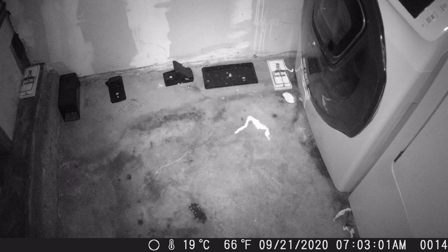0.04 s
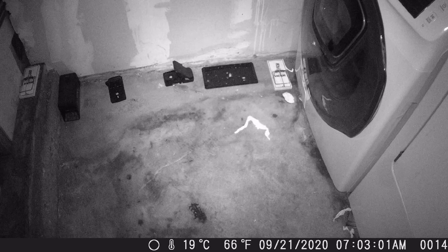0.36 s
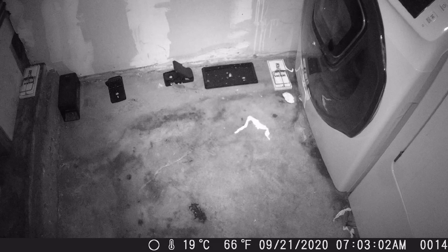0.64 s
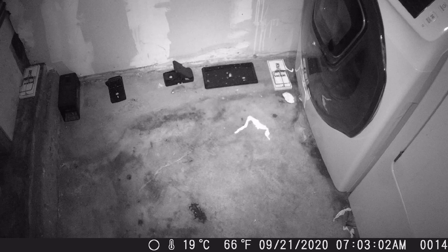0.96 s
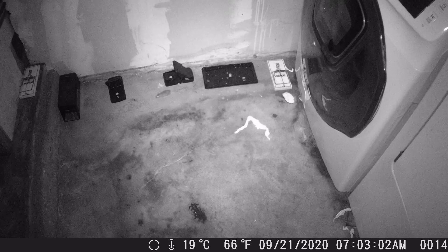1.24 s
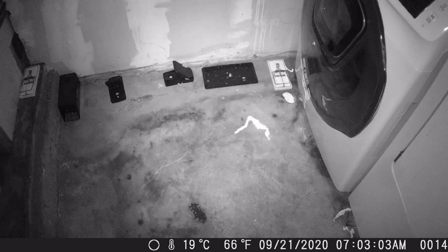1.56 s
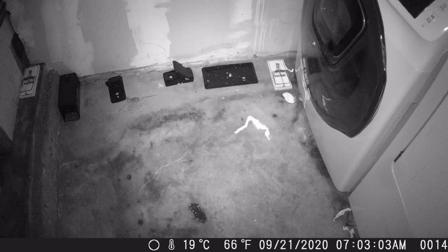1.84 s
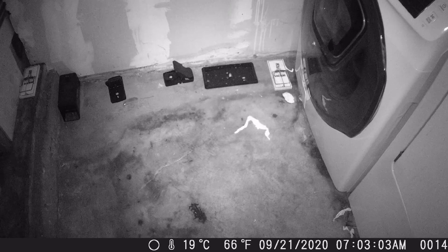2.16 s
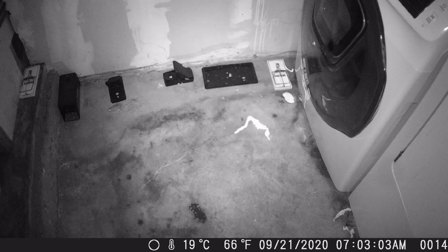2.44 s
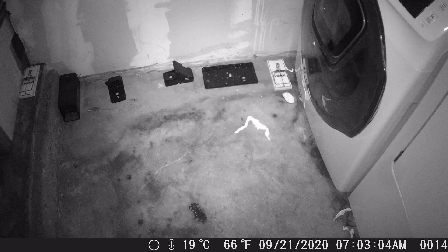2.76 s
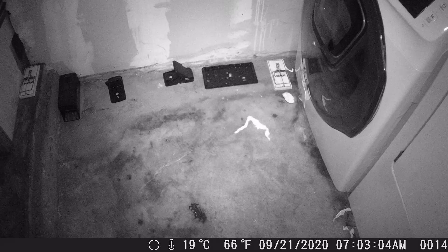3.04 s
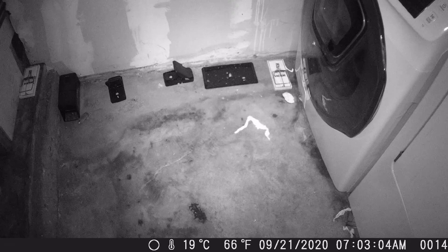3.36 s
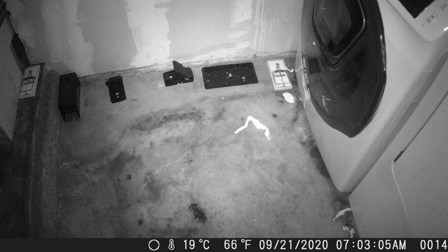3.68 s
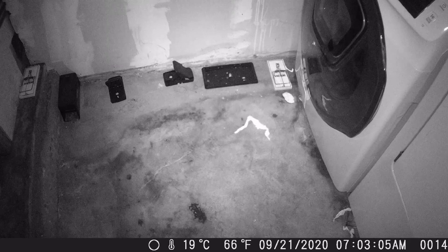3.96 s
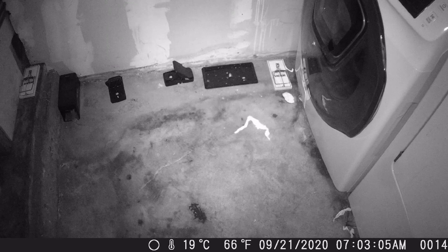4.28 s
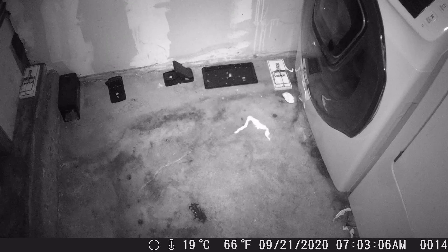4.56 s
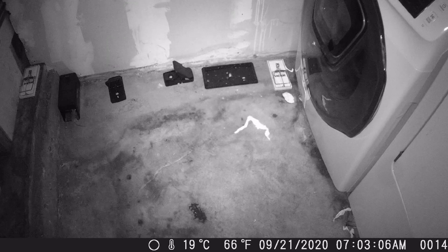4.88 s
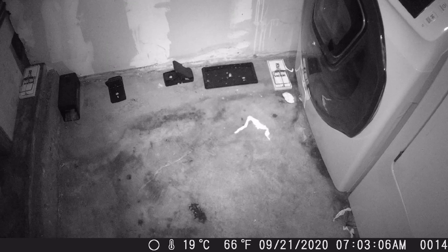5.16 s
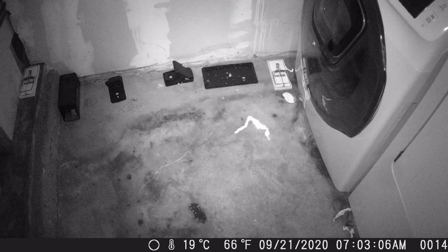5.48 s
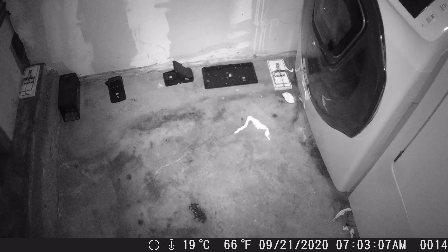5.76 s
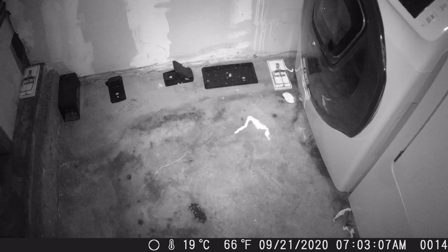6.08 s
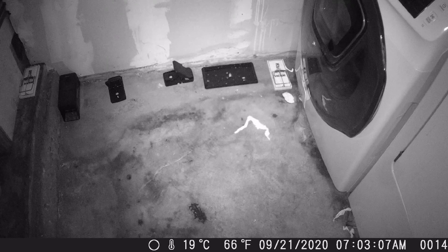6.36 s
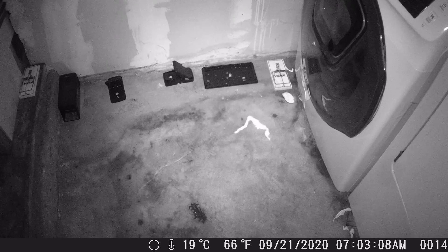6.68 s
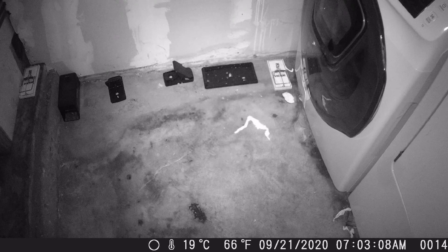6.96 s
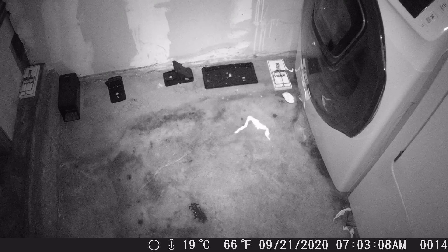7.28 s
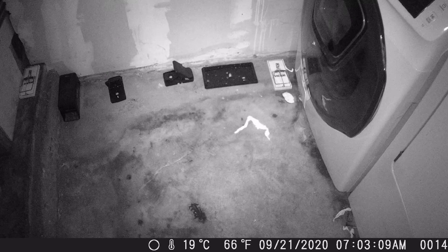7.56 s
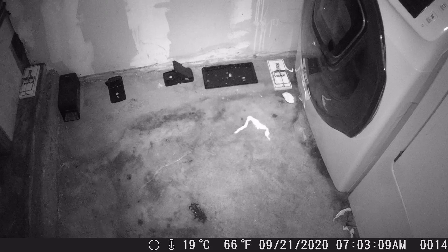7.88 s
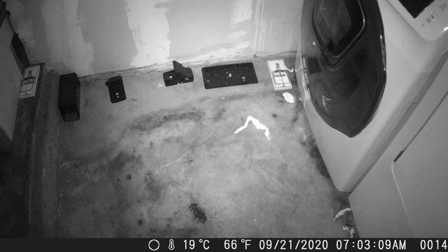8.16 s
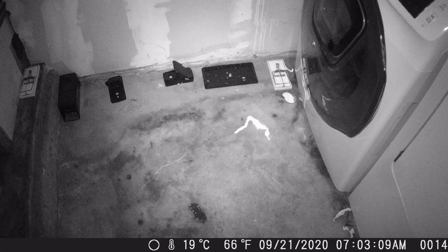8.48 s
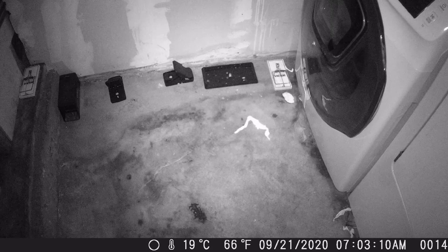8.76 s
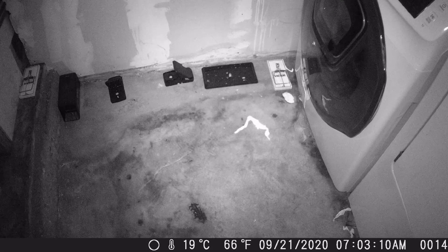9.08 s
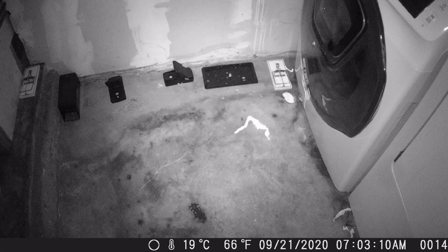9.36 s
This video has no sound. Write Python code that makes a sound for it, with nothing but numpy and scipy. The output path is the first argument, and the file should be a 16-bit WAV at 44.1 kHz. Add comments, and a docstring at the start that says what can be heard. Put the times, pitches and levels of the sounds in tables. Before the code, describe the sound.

Fast, regular, rattly ticking runs over soft hiss and low room rumble, with one light, more distant tap partway through.

```python
"""A quiet garage at night: low room rumble, faint mains hum and microphone hiss are there throughout.
From the start, a small mechanism close by ticks five times a second. In each tick its parts touch and
shake the case, giving a short rattle and a soft thud; in most, a metal part snaps home with a sharp ping.
Near five seconds the rumble swells briefly. At about 6.6 seconds something further off taps lightly,
rebounds and settles, leaving a thin ring. The ticking goes on to the end."""
import sys
import numpy as np
from scipy import signal
from scipy.fft import rfft, irfft
from scipy.io import wavfile

SR = 44100
rng = np.random.default_rng(int(sys.argv[2]) if len(sys.argv) > 2 else 0)


def log_audio(samples):
    """Write samples as a 16-bit WAV file to the path given in sys.argv[1]."""
    # one column per channel
    frames = np.atleast_2d(samples).T
    # limit to full scale, then quantise
    limited = np.clip(frames, -1, 1)
    pcm = np.round(limited * 32767).astype(np.int16)
    wavfile.write(sys.argv[1], SR, pcm)


N = 420273

# The far taps. Each row: start in seconds, echo level in dB, pitch in Hz above which the echo is dull,
# seconds for the echo to fade by 60 dB, clink level in dB, clink pitch as a ratio.
FAR_TAPS = [(6.620, -65.5, 2980, 0.14, -57.5, 0.95), (6.676, -80, 2000, 0.06, -66, .95),
            (6.758, -72, 520, .05, -90, 0.87), (6.779, -69.5, 480, 0.2, -90, 1)]
# The tones of the metal part. Each row: pitch in Hz, relative level in dB, seconds to fade by 60 dB.
PING_TONES = [(4163, 0.5, 0.015), (3616, -4, .007), (8000, -5, .008)]


def gain_of(db):
    """Turns decibels into a number to multiply a sound by."""
    return 10 ** (np.asarray(db) / 20)


def evened(x):
    """Scales a sound so that its average strength (rms) is 1."""
    return x / np.sqrt(np.mean(x ** 2) + 1e-30)


def add(mix, s, sound):
    """Mixes a sound in, starting at s seconds."""
    part = mix[max(round(s * SR), 0):][:len(sound)]
    part += sound[:len(part)]


def envelope(start_s, attack_s, hold_s, release_s):
    """Rises from 0 to 1, holds, and falls back to 0."""
    return np.interp(np.arange(N) / SR, start_s + np.cumsum([0, attack_s, hold_s, release_s]), [0, 1, 1, 0])


def noise(spectrum):
    """Steady noise whose strength from low to high follows the given rows."""
    hz, db = np.transpose(spectrum)
    shape = gain_of(np.interp(np.log(np.fft.rfftfreq(N, 1 / SR) + 1), np.log(hz + 1), db))
    return irfft(rfft(rng.standard_normal(N)) * shape, N) * np.sqrt(SR / 2)


def low_pass(x, hz, order):
    """Keeps what lies below hz; a higher order cuts more sharply."""
    return signal.oaconvolve(x, signal.firwin(order, hz, fs=SR), "same")


def resonances(table, f):
    """How strongly an object answers at frequencies f: most near the pitches it likes to ring at."""
    return np.sqrt(sum(gain_of(db) ** 2 / (1 + ((f - hz) / width) ** 2) ** 2 for hz, width, db in table))


def knock(table, size=8192):
    """The sound an object makes after one sharp click."""
    f = abs(np.fft.fftfreq(size, 1 / SR))
    log_gain = np.log(resonances(table, f) + 1e-5)
    spectrum = np.exp(np.conj(signal.hilbert(log_gain)))  # puts the ringing after the click
    return np.fft.ifft(spectrum).real


def struck(tones, pitch, size=8192):
    """The fading tones of a struck part, with every frequency multiplied by pitch."""
    t = np.arange(size) / SR
    return sum(gain_of(db - 60 * t / fade_s) * np.sin(2 * np.pi * hz * pitch * t)
               for hz, db, fade_s in tones)


def microphone_hiss():
    """The microphone's own steady hiss."""
    # Each row: frequency in Hz, level in dB per Hz.
    hiss_spectrum = [(300, -101), (700, -102.6), (1100, -105.6), (1900, -110.3), (2600, -113.9),
                     (2950, -117.3), (3200, -122), (3400, -119.3), (4000, -121.5), (4800, -125.4),
                     (6000, -124), (7100, -120.9), (7900, -124), (8500, -128)]
    return noise(hiss_spectrum)


def room_rumble(deep_hz=28, deep_db=-0.4, surge_db=7.5, swell_s=.15):
    """The room's low rumble swells briefly, and its deepest part surges once."""
    # The rumble at rest. Each row: frequency in Hz, level in dB per Hz.
    rumble_spectrum = [(2, -83), (13, -58.5), (22, -73.5), (35, -70), (48, -76), (100, -87), (160, -91.5),
                       (250, -95.5), (420, -102.5), (3000, -160)]
    # Swells of the whole rumble. Each row: time of the top in seconds, height in dB.
    swells = [(4.25, 0), (4.88, 1.5), (5.31, 0.5)]
    swell_db = sum(db * envelope(s - swell_s, swell_s, 0, swell_s) for s, db in swells)
    rumble = noise(rumble_spectrum) * gain_of(swell_db)
    deep = low_pass(rumble, deep_hz, order=8191)
    surge = envelope(start_s=4.56, attack_s=.4, hold_s=0, release_s=.61)
    return rumble + deep * (gain_of(deep_db + surge_db * surge) - 1)


def mains_hum(hz=60, level_db=-69, waver=0.32):
    """The low hum of mains electricity, slowly wavering in loudness."""
    drift = evened(low_pass(rng.standard_normal(N), hz=2, order=32767))
    tone = np.sqrt(2) * np.sin(2 * np.pi * hz * np.arange(N) / SR)
    return gain_of(level_db) * tone * (1 + waver * drift)


def thin_ring(hz=7065, level_db=-93):
    """A thin high tone, set off by the first far tap, lingers for a moment."""
    fade = envelope(start_s=FAR_TAPS[0][0], attack_s=.03, hold_s=.07, release_s=.18)
    tone = np.sqrt(2) * np.sin(2 * np.pi * hz * np.arange(N) / SR)
    return gain_of(level_db) * fade * tone


def far_taps(clink_rise_s=.004, echo_rise_s=.012, echo_delay_s=.005):
    """Each tap clinks, then its room echo grows and dies away at the tapped thing's own pitches."""
    # The hard clink, heard directly. Each row: pitch in Hz, relative level in dB, seconds to fade by 60 dB.
    clink_tones = [(2250, 4, 0.033), (3700, -12, .03), (4100, -5, .032)]
    # Where the tapped thing rings. Each row: pitch in Hz, width in Hz, relative level in dB.
    tapped_resonances = [(684, 48, -6.5), (877, 46, -3), (1085, 80, 0), (1335, 92, -3.5),
                         (2180, 300, -10.5), (2840, 170, -13), (3530, 160, -10), (4020, 130, -8)]
    t, f = np.arange(SR) / SR, np.fft.rfftfreq(SR, 1 / SR)
    body = resonances(tapped_resonances, f)
    out = np.zeros(N)
    for s, echo_db, dull_hz, fade_s, clink_db, pitch in FAR_TAPS:
        clink = struck(clink_tones, pitch, size=SR) * (1 - np.exp(-t / clink_rise_s))
        add(out, s, gain_of(clink_db) * clink)
        dulled_body = body / (1 + (f / dull_hz) ** 4)
        echo = evened(irfft(rfft(rng.standard_normal(SR)) * dulled_body, SR))
        bloom = gain_of(-60 * t / fade_s) * (1 - np.exp(-t / echo_rise_s))
        add(out, s + echo_delay_s, gain_of(echo_db) * echo * bloom / bloom.max())
    return out


def beat(first_s=.0292, every_s=.19991, full_db=-0.5, weak_db=-4.5):
    """The mechanism's even beat, as pairs of time and strength; about every fourth tick is weak."""
    first_weak, weak_every = 3.05, 3.875  # counted in ticks
    times = np.arange(first_s, N / SR, every_s)
    weak = (np.arange(len(times)) - first_weak + .5) % weak_every < 1
    return zip(times, np.where(weak, weak_db, full_db))


def ticks(rasp_db=-34, touch_db=-77, scatter_db=1.2, scrape_s=.0048, detune=.013, size=4096):
    """Each tick is a few brief contacts: their scraping shakes the case and the metal part pings lightly."""
    # The contacts in one tick. Each row: offset from the beat in seconds, relative scrape level in dB,
    # relative ping level in dB, random spread of the timing in seconds.
    contacts = [(-.014, -7.5, -7, 0.0038), (0, -2.5, -2.5, 0.0014), (0.014, -2.5, -3, 0.0038),
                (0.02, -3.5, -4, 0.0023), (0.031, -3.5, -10, .003), (.041, -2, -28, 0.0033)]
    # Where the case rings; the lowest pitch gives the soft thud.
    # Each row: pitch in Hz, width in Hz, relative level in dB.
    case_resonances = [(87.5, 36, 27), (214, 83, 13.5), (700, 510, 1), (1167, 120, 0.5), (1512, 180, 2),
                       (2368, 240, -.5), (2850, 180, -9), (3810, 190, -11.5), (7200, 230, -12.5),
                       (7990, 220, -16)]
    t = np.arange(size) / SR
    scrapes, pings = np.zeros(N), np.zeros(N)
    for s, db in beat():
        for offset_s, scrape_db, ping_db, scatter_s in contacts:
            late, harder, higher = rng.standard_normal(3)
            start_s = s + offset_s + scatter_s * late
            force = gain_of(db + scatter_db * harder)
            scrape = rng.standard_normal(size) * np.exp(-t / scrape_s)
            add(scrapes, start_s, force * gain_of(scrape_db) * scrape / np.linalg.norm(scrape))
            ping = struck(PING_TONES, 1 + detune * higher)
            add(pings, start_s, force * gain_of(touch_db + ping_db) * ping)
    rasp = gain_of(rasp_db) * signal.oaconvolve(scrapes, knock(case_resonances))[:N]
    return rasp + pings


def snaps(detune=.016):
    """In most ticks the metal part snaps home with a sharp ping, seating a little differently each time."""
    # Each row: start in seconds, level in dB.
    snap_events = [(0.2287, -77), (0.4514, -78), (0.612, -73), (0.846, -78), (1.0291, -77), (1.248, -74),
                   (1.4114, -72), (1.6285, -75), (1.8262, -80), (2.0123, -79), (2.2473, -77), (2.429, -79),
                   (2.6285, -75), (2.817, -73), (3.2564, -75), (3.4485, -77), (3.6383, -73), (3.8514, -74),
                   (4.0512, -78), (4.2228, -79), (4.4142, -76), (4.6294, -79), (4.8279, -77), (5.0439, -75),
                   (5.4563, -74), (5.6491, -78), (5.8266, -74), (6.2277, -74), (6.4472, -78), (6.812, -71),
                   (7.0296, -77), (7.229, -77), (7.414, -78), (7.8591, -79), (8.0473, -78), (8.216, -75),
                   (8.6505, -73), (8.8479, -76), (9.013, -76), (9.2113, -73), (9.4287, -76)]
    out = np.zeros(N)
    for s, db in snap_events:
        pitch = 1 + detune * rng.standard_normal()
        add(out, s, gain_of(db) * struck(PING_TONES, pitch))
    return out


def scene():
    """Everything that reaches the one microphone, plus its own hiss."""
    background = room_rumble() + mains_hum() + microphone_hiss()
    return (background + thin_ring() + far_taps() + ticks() + snaps())[None]


def record(dry, microphone_hz=8220, floor_db=-95.5, top_hz=15800):
    """The microphone loses the high treble, its electronics add faint noise, and the very top is cut."""
    narrow = low_pass(dry[0], microphone_hz, order=201)
    electronic_noise = gain_of(floor_db) * rng.standard_normal(N)
    return low_pass(narrow + electronic_noise, top_hz, order=511)[None]


dry = scene()
out = record(dry)
log_audio(out)
```